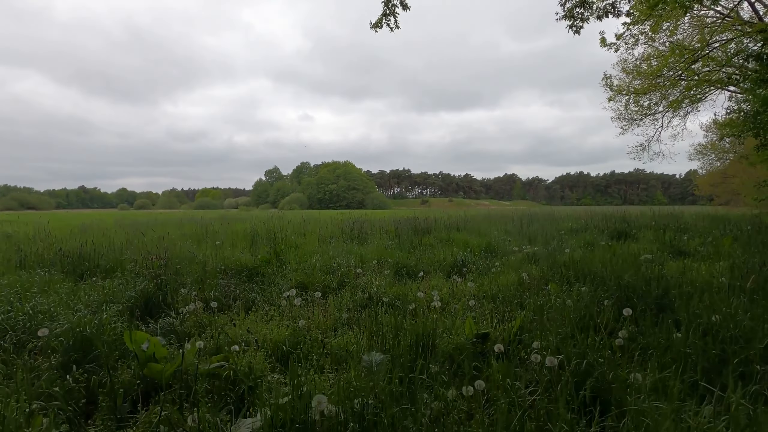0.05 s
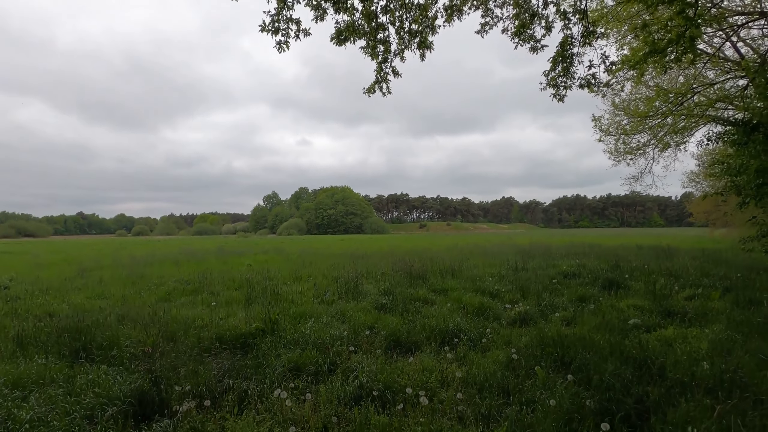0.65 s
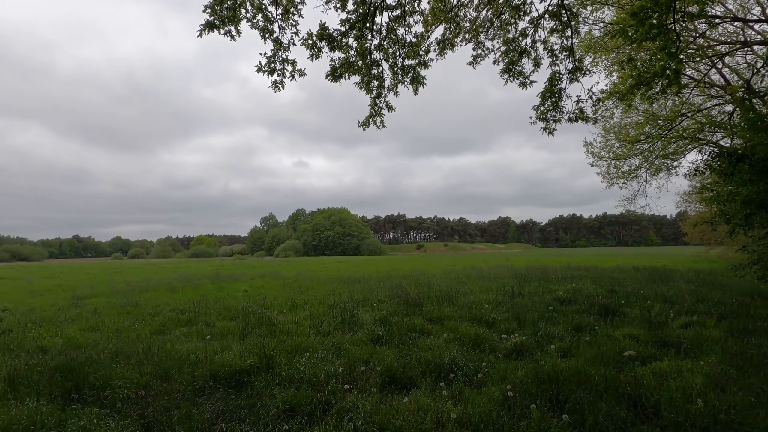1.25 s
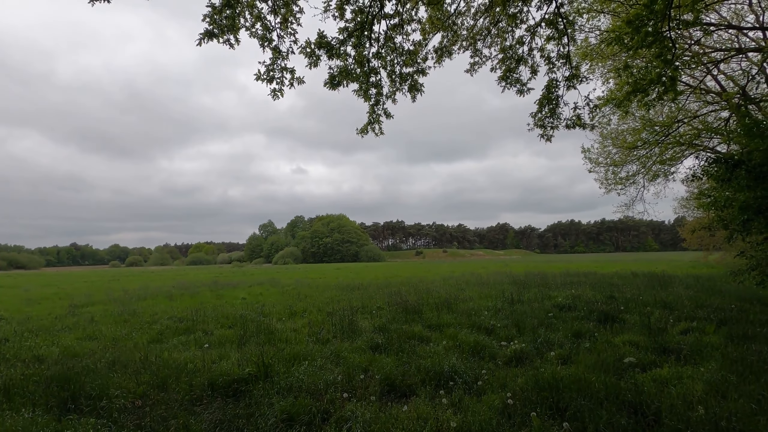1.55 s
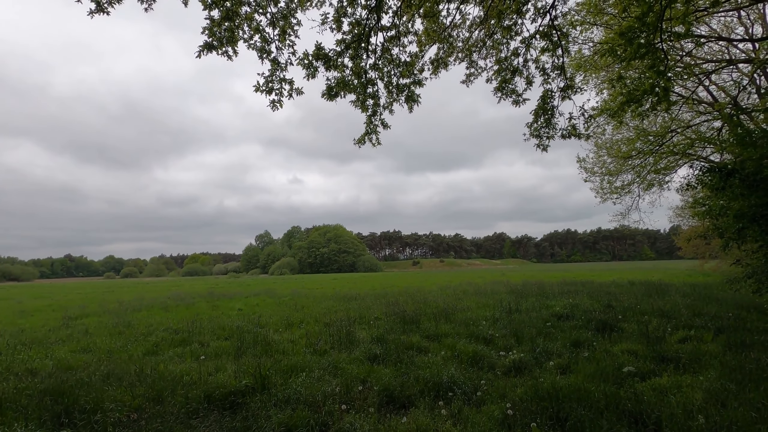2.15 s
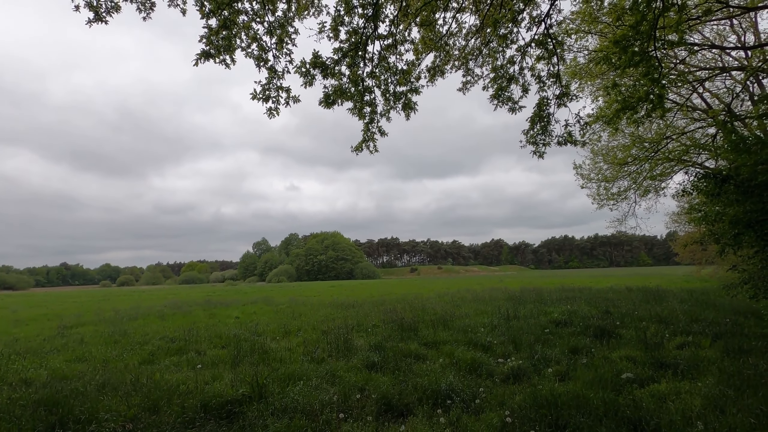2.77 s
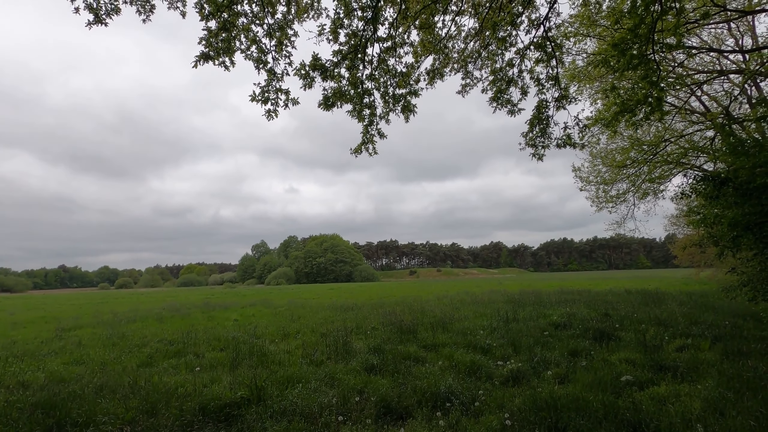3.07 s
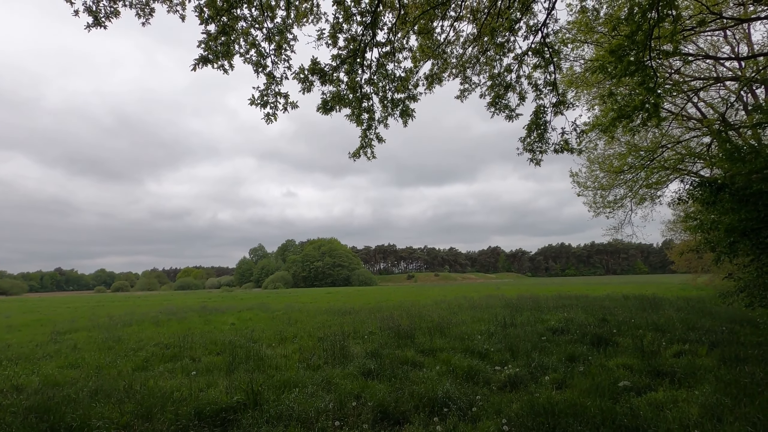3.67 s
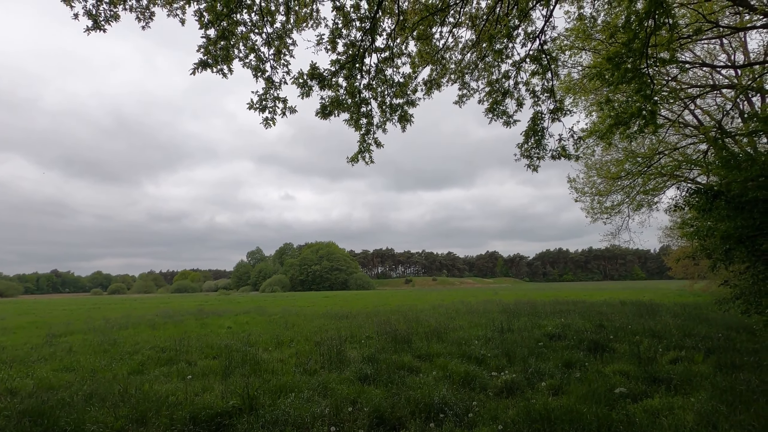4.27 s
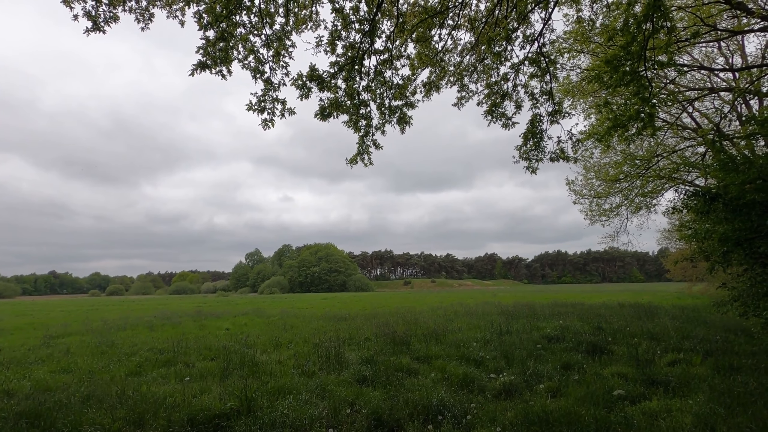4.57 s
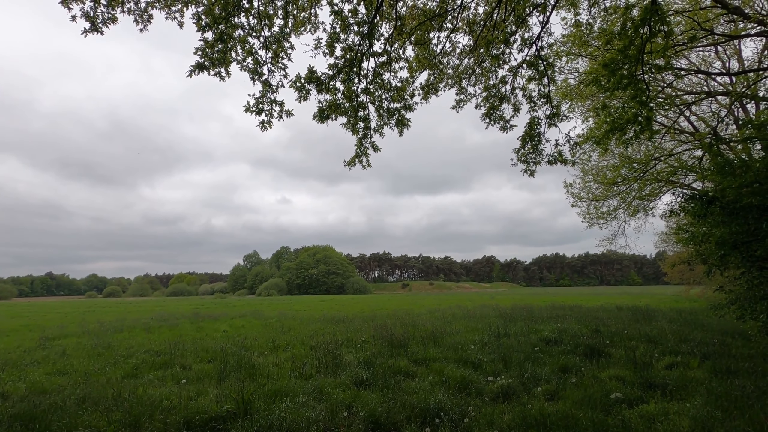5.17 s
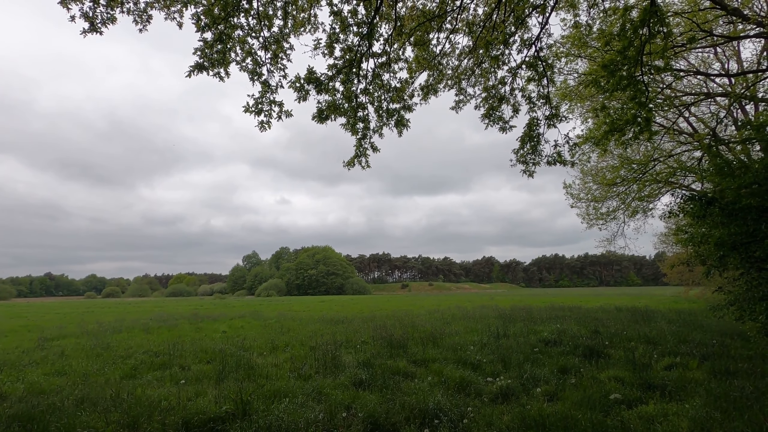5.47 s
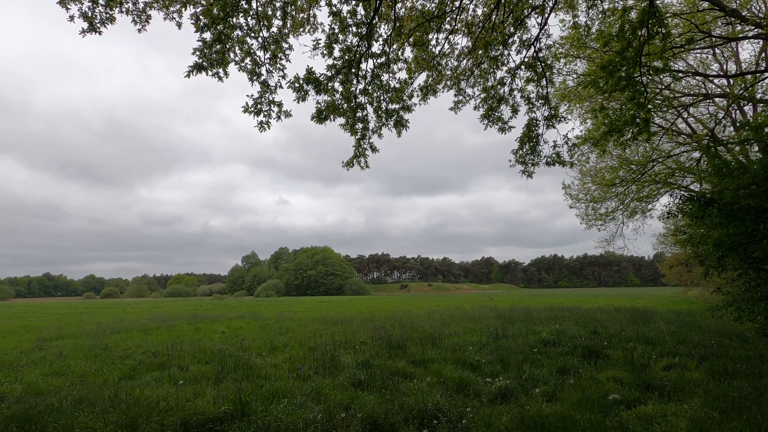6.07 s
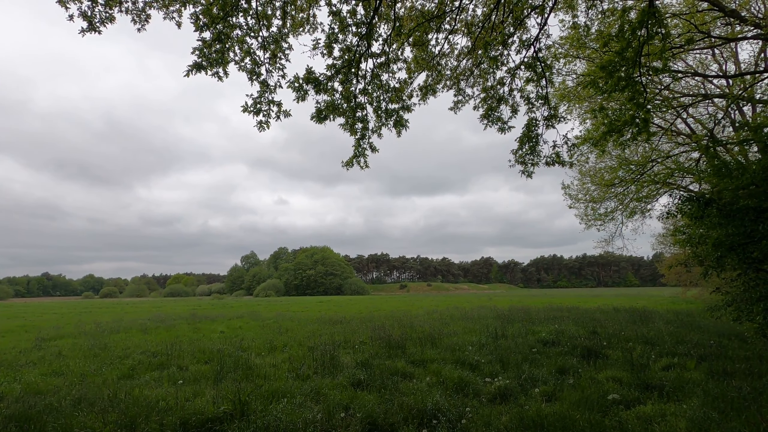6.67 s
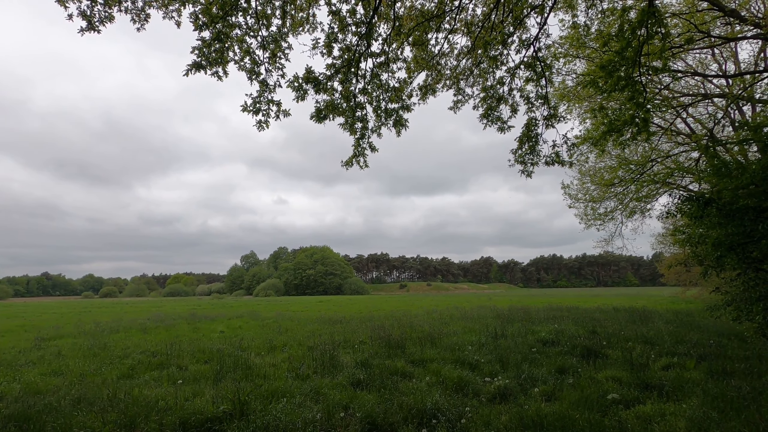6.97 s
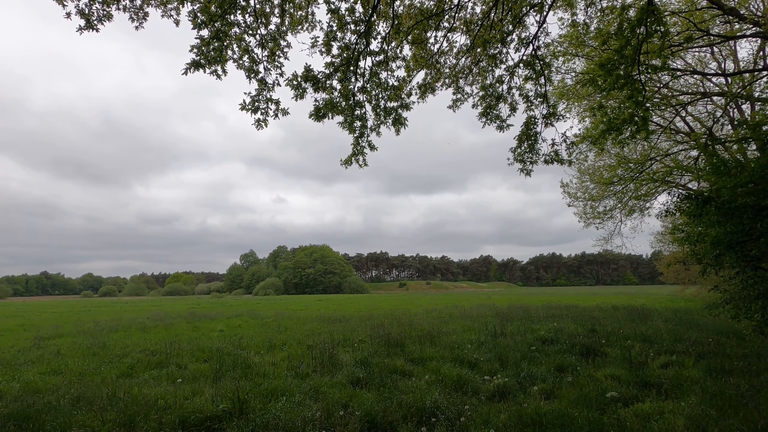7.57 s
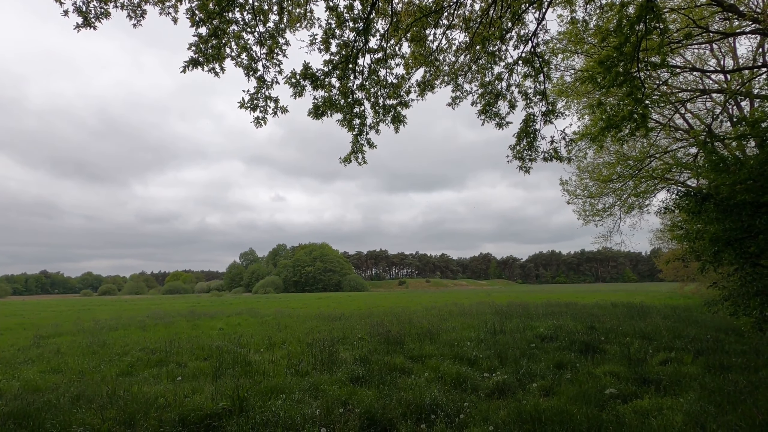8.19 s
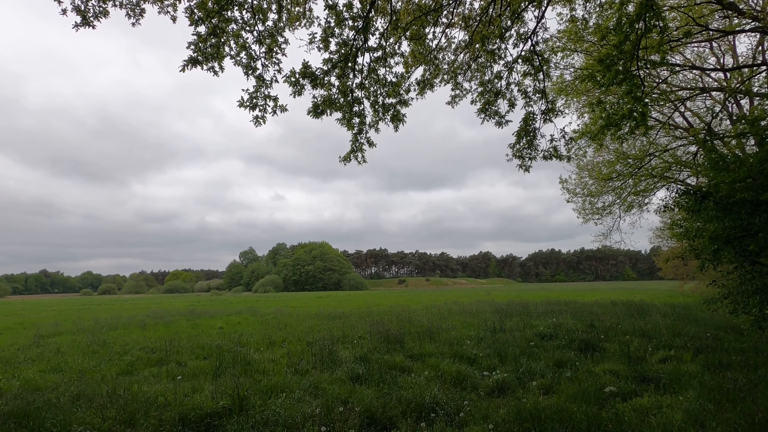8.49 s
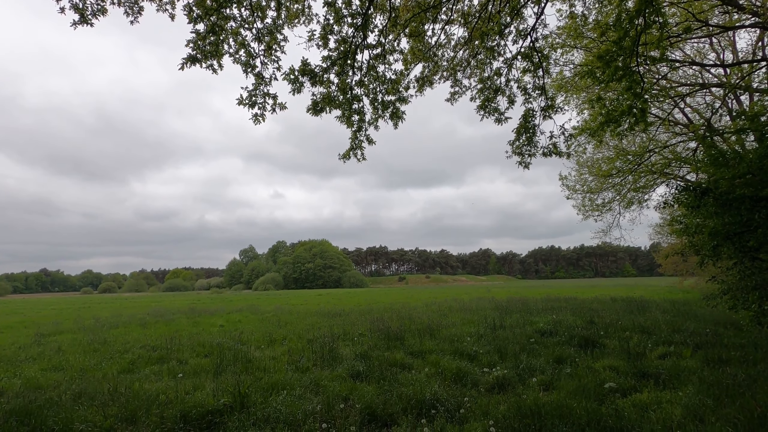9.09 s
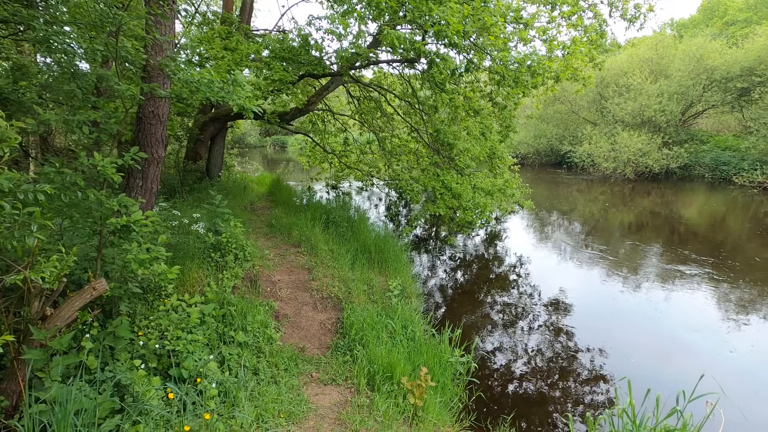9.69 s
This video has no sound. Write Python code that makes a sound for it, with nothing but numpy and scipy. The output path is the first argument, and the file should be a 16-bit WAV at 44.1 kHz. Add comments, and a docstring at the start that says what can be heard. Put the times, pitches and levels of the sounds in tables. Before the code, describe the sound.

A cuckoo calls repeatedly across a meadow while songbirds chirp and sing close by, after a brief rumble of wind on the microphone.

```python
"""Cuckoo across a meadow

A cuckoo calls seven times, its two nearly pure notes echoed by the edge of a wood. Close by, a
chaffinch sings one accelerating song among warblers and other songbirds; each voice is a gliding
tone from the syrinx, scattered by trees into reverberation. At first, turbulent wind buffets the
microphone and rustles the leaves. The sound stops abruptly near the end."""
import sys
import numpy as np
from scipy import signal
from scipy.fft import rfft, irfft
from scipy.io import wavfile
from scipy.ndimage import uniform_filter1d

SR = 44100
rng = np.random.default_rng(int(sys.argv[2]) if len(sys.argv) > 2 else 0)


def transcribe(signal):
    """Save signal, clipped to [-1, 1], as a 16-bit WAV file at the path in sys.argv[1]."""
    frames = np.atleast_2d(signal).T
    limited = np.clip(frames, -1, 1)
    pcm = np.round(limited * 32767).astype(np.int16)
    wavfile.write(sys.argv[1], SR, pcm)


N = 433944
TIME = np.arange(N) / SR


def undb(db):
    """The decibel scale: amplitude grows tenfold every 20 dB."""
    return 10 ** (np.asarray(db) / 20)


def curve(rows):
    """Linear interpolation of (time_s, value) rows over the whole scene."""
    return np.interp(TIME, *np.transpose(rows))


def walk(rate_hz, size):
    """Random modulation: Gaussian values joined by straight lines, with a spread near 1."""
    position = np.arange(size) / SR * rate_hz
    knots = int(position[-1]) + 2
    return 1.2 * np.interp(position, np.arange(knots), rng.standard_normal(knots))


def pan(db):
    """Interaural level difference: gains of mean power 1, the left db above the right."""
    gains = undb(np.array([[db], [-db]]) / 2)
    return gains / np.sqrt(np.mean(gains ** 2))


def add(out, start_s, x):
    """Superposition: a sound is summed into the mix from its starting time."""
    i = max(int(start_s * SR), 0)
    out[..., i:i + x.shape[-1]] += x[..., :max(N - i, 0)]


def beats(first_s, last_s, period_s, change_s=0):
    """Onsets in a rhythm whose period changes by change_s from note to note."""
    k = np.arange(round((last_s - first_s) / period_s) + 1)
    return np.linspace(first_s, last_s, len(k)) + change_s * k * (k - k[-1]) / 2


def correlated_pair(noises, correlation):
    """Partial coherence: two independent noises each take a share of a third."""
    return noises[:2] * np.sqrt(1 - correlation) + noises[2] * np.sqrt(correlation)


def noise(spectrum, correlation=0, pan_db=0):
    """Spectral shaping: stereo noise of rms 1 follows (frequency_hz, level_db) rows."""
    hz, db = np.transpose(spectrum)
    bins_hz = np.maximum(np.fft.rfftfreq(N, 1 / SR), 1)
    gain = undb(np.interp(np.log(bins_hz), np.log(hz), db, left=-120, right=-120))
    white = correlated_pair(rng.standard_normal((3, N)), correlation)
    shaped = irfft(rfft(white) * gain, N)
    return shaped / shaped.std() * pan(pan_db)


def whistle(hz, rms):
    """A syrinx sings a nearly pure tone, whose phase is the integral of its frequency."""
    return np.sqrt(2) * rms * np.sin(2 * np.pi * np.cumsum(hz) / SR)


def syllable(shape, stretch, pitch_ratio, waver, overtone_db=-60):
    """Frequency modulation: a whistle and its second harmonic waver along a rounded contour."""
    time_s, hz, db = np.transpose(shape)
    t = np.arange(int(time_s[-1] * stretch * SR)) / SR / stretch
    contour_hz = uniform_filter1d(np.interp(t, time_s, hz), len(t) // 20)
    pitch_hz = contour_hz * pitch_ratio * (1 + waver * walk(350, len(t)))
    gain = undb(np.interp(t, time_s, db)) * signal.windows.tukey(len(t), .08)
    return whistle(pitch_hz, gain) + whistle(2 * pitch_hz, gain * undb(overtone_db))


def wood(x, t60_s, build_s, grain):
    """Multiple scattering by trunks and crowns: a tail builds up, then decays exponentially."""
    t = np.arange(int(1.5 * SR)) / SR
    reflections = rng.standard_normal((3, len(t)))
    reflections *= np.exp(grain * rng.standard_normal((3, len(t))))  # a few stand out
    tail = correlated_pair(reflections, correlation=.53)
    tail *= undb(-60 * t / t60_s) * (1 - np.exp(-t / build_s))
    tail /= np.sqrt(np.sum(tail ** 2, axis=1, keepdims=True))
    return signal.fftconvolve(np.atleast_2d(x), tail, axes=1)[:, :N]


def branches(x, direct_db, t60_s):
    """Early reflections from twigs and leaves follow the direct sound, which leans to the left."""
    return undb(direct_db) * x * pan(10) + wood(x, t60_s, build_s=.0051, grain=.44)


def wind(rise_db_per_s=221, fall_db_per_s=255):
    """Turbulent pressure on the microphone ports: a rumble that swells and dies with each gust."""
    # light air between gusts: time_s, level_db
    draught = [(.5, -45.5), (.66, -66), (1.5, -74.5), (2.1, -81), (4.8, -78), (5.0, -88), (6.5, -83),
               (9.6, -81)]
    # gusts: peak_s, level_db
    gusts = [(0.028, -29.5), (0.128, -27), (0.294, -25.5), (0.449, -40), (.81, -57.5), (1.241, -39),
             (1.4, -55), (2.35, -61)]
    # spectrum of the rumble: frequency_hz, level_db
    spectrum = [(12, -33.5), (20, 5), (43, 3), (63, 2), (110, -15), (198, -31.5), (400, -49), (520, -80),
                (880, -120)]
    level_db = curve(draught)
    for peak_s, peak_db in gusts:
        drop_db = np.maximum((peak_s - TIME) * rise_db_per_s, (TIME - peak_s) * fall_db_per_s)
        level_db = np.maximum(level_db, peak_db - drop_db)
    return noise(spectrum, correlation=.11, pan_db=4) * undb(level_db + 5 + walk(17, N))


def leaves():
    """Leaves stirred by the wind add incoherently to a flickering broadband noise."""
    # spectrum of the rustle: frequency_hz, level_db
    spectrum = [(500, -25), (1100, 2), (1800, 0.5), (3000, -1), (5000, -2), (7500, -14), (9500, -23.5),
                (13000, -43.5), (15000, -48)]
    # its envelope: time_s, level_db
    rustle = [(0, -61), (.3, -67), (.38, -65), (.5, -59.5), (.6, -68), (.85, -72), (1.3, -79.5), (2, -110)]
    return noise(spectrum, correlation=.24, pan_db=4.5) * undb(curve(rustle) + 2 * walk(90, N))


def air(level_db=-70):
    """Ambient noise: a faint, nearly steady floor lies under everything."""
    # spectrum of the open air: frequency_hz, level_db
    spectrum = [(20, 4), (55, -1), (107, -8), (186, 5.5), (280, -1.5), (646, -5.5), (900, -10.5),
                (1500, -11), (3000, -5), (5000, -24.5), (8000, -24), (9000, -34), (15500, -35)]
    return noise(spectrum, correlation=.19, pan_db=-1) * undb(level_db + .7 * walk(4, N))


def chorus():
    """Incoherent summation: the short slurs of many far birds merge with a band of noise."""
    # spectrum of the chorus: frequency_hz, level_db
    spectrum = [(1400, -29), (2200, -9.5), (3200, -0.5), (4400, 0), (5500, -11), (7400, -28), (8600, -35)]
    # swell of the birds deep in the wood: time_s, level_db
    swell = [(0, -77), (.8, -72), (1.5, -67.5), (3, -74), (5.3, -57.5), (6, -76), (6.8, -62.5),
             (7.8, -60.5), (9.6, -70)]
    hz, db = np.transpose(spectrum)
    chirps = np.zeros(N)
    for when, height, length, slope, loud in rng.random((420, 5)):
        size = int((.0301 + .09 * length) * SR)
        centre_hz = 1900 + 5600 * height
        pitch_hz = centre_hz * (1 + .4 * (slope - .6) * np.linspace(-.5, .5, size))
        envelope = np.hanning(size) * undb(np.interp(centre_hz, hz, db) + 10 * loud)
        add(chirps, when * N / SR, whistle(pitch_hz, envelope))
    far = wood(chirps, t60_s=.74, build_s=.021, grain=.3)
    shimmer = undb(2.5) * far / far.std() + undb(-5) * noise(spectrum)
    return shimmer * undb(curve(swell)) * pan(5.8)


def songbirds(flutter_hz=95):
    """Fast modulation of frequency and amplitude adds sidebands, turning some whistles to buzzes."""
    # the loudest whistles, slurs and buzzes:
    # start_s, perch, length_s, start_hz, middle_hz, end_hz, buzz_depth, level_db
    notes = [(0.059, "ahead", 0.13, 3845, 4010, 4010, 0.3, -58.5),
             (0.077, "ahead", .16, 2380, 2350, 2340, 0.06, -67.5),
             (0.12, "ahead", 0.11, 6500, 5850, 5800, 0.07, -74.5),
             (0.249, "overhead", 0.045, 5700, 5000, 4200, 0, -65),
             (0.29, "ahead", 0.14, 2350, 2018, 1690, 0.14, -61),
             (1.404, "bush", 0.12, 4970, 4140, 2460, .18, -62.5),
             (2.439, "trees", 0.044, 3420, 2960, 2750, 0.03, -63),
             (2.473, "trees", 0.044, 6600, 5520, 5200, 0.13, -58),
             (2.68, "bush", 0.062, 2790, 2940, 3950, 0, -65.5),
             (3.387, "bush", 0.082, 3700, 3190, 3130, 0.22, -60.5),
             (3.422, "overhead", 0.043, 5870, 5490, 5400, 0.07, -53.5),
             (3.692, "trees", .08, 2713, 2555, 2480, 0.1, -62.5),
             (3.918, "trees", 0.041, 3234, 2885, 2300, 0.34, -52),
             (3.949, "finch", .044, 2585, 3323, 3390, .8, -49),
             (4.045, "finch", 0.025, 4420, 5630, 4530, 0.46, -53),
             (4.066, "finch", 0.062, 4475, 3420, 3040, 0.7, -46.5),
             (4.103, "trees", 0.082, 3300, 2570, 2197, 0.63, -54.5),
             (4.389, "wood", 0.29, 1570, 1540, 1563, 0.17, -70.5),
             (4.554, "ahead", 0.045, 2437, 2350, 2420, 0.7, -53),
             (4.743, "wood", 0.1, 6930, 7150, 7140, .6, -77),
             (4.756, "ahead", .15, 2800, 2170, 1660, 0.87, -61),
             (4.881, "finch", 0.028, 3570, 3930, 3120, 0.48, -41),
             (5, "finch", 0.062, 4800, 4170, 3970, 0.75, -48),
             (5.068, "trees", 0.12, 3880, 2862, 1942, 0.51, -52),
             (5.319, "ahead", 0.055, 3500, 3310, 2900, 0, -59),
             (5.483, "overhead", 0.031, 6600, 5820, 3930, 0, -68.5),
             (5.521, "overhead", 0.049, 3570, 3503, 3490, .06, -58.5),
             (5.545, "overhead", 0.05, 2935, 2660, 2325, 0.3, -55),
             (5.641, "overhead", 0.063, 2400, 2130, 2150, 0.52, -59.5),
             (5.712, "overhead", .052, 2315, 2720, 2940, 0.2, -53),
             (5.851, "overhead", 0.16, 2267, 2235, 2223, 0.01, -58),
             (5.919, "ahead", .069, 6070, 5970, 6240, 0.6, -70),
             (5.96, "ahead", 0.092, 3260, 3426, 3500, 0.38, -60.5),
             (6.102, "overhead", 0.045, 2210, 2930, 3780, 0.26, -54.5),
             (6.127, "bush", 0.12, 3690, 3830, 3890, 0.33, -53),
             (6.327, "bush", 0.091, 8020, 7980, 7700, 0.21, -77),
             (6.36, "bush", 0.017, 4180, 4640, 5170, 0.08, -52.5),
             (6.381, "overhead", 0.021, 3490, 3030, 2420, 0.1, -58),
             (6.408, "overhead", 0.028, 2560, 2780, 3220, 0.2, -58),
             (6.473, "trees", .07, 7550, 7260, 7320, 0.46, -70.5),
             (6.559, "trees", 0.025, 4410, 4810, 5160, 0.1, -54),
             (6.652, "bush", 0.082, 4320, 4020, 3990, 0.72, -60.5),
             (6.79, "bush", 0.038, 3634, 3690, 4350, 0.58, -53.5),
             (6.88, "bush", 0.088, 2635, 3028, 2930, 0, -50),
             (7.029, "trees", 0.036, 4860, 5040, 5080, .3, -54.5),
             (7.032, "trees", .081, 7200, 7220, 7360, 0.4, -73),
             (7.231, "overhead", 0.13, 4400, 4307, 4310, 0.05, -53),
             (7.497, "bush", 0.018, 3730, 3620, 2940, 0.04, -50),
             (7.529, "trees", .19, 3180, 2690, 2160, 0.01, -65),
             (7.709, "bush", 0.12, 3950, 3730, 3660, .36, -54),
             (7.781, "bush", 0.079, 3560, 3315, 3700, .05, -47),
             (7.898, "bush", 0.12, 2940, 2767, 3320, 0.1, -54),
             (8.055, "trees", 0.089, 5100, 4750, 4200, 0.04, -60.5),
             (8.136, "bush", .1, 3900, 3150, 3213, 0.04, -49.5),
             (8.227, "trees", .14, 7620, 7860, 7760, 0.06, -69),
             (8.306, "bush", 0.086, 3520, 3342, 3497, 0, -49),
             (8.413, "ahead", 0.085, 2300, 2466, 2560, 0, -58.5),
             (8.497, "ahead", 0.12, 6900, 6300, 5950, 0.49, -73),
             (8.759, "trees", 0.062, 4900, 4256, 3250, 0.83, -59.5),
             (8.948, "ahead", 0.2, 5400, 5180, 5325, 0.1, -55),
             (9.234, "trees", 0.19, 7470, 6960, 6750, 0.26, -66.5),
             (9.479, "trees", 0.089, 5100, 4624, 3740, 0.17, -54.5)]
    # sound paths from each perch: pan_db, direct_db, scattered_db
    perches = {"finch": (11, -3, -5.5), "bush": (18, -2.9, -4), "trees": (4.6, -3.5, -1.5),
               "ahead": (-4, -2.5, -3), "overhead": (-1, -0.54, -8), "wood": (9, -4.5, 0)}
    direct, scattered = np.zeros((2, N)), np.zeros(N)
    for start_s, perch, length_s, start_hz, middle_hz, end_hz, buzz, db in notes + soft_phrases():
        size = int(length_s * SR)
        flutter_phase = 2 * np.pi * np.cumsum(flutter_hz * (1 + .045 * walk(40, size))) / SR
        parabola = np.polyfit([0, .5, 1], [start_hz, middle_hz, end_hz], 2)
        contour_hz = np.polyval(parabola, np.linspace(0, 1, size))
        roughness = buzz * (.16 * np.cos(flutter_phase) + .035 * walk(702.7, size))
        pitch_hz = contour_hz * (1 + roughness + .0045 * walk(200, size))
        envelope = signal.windows.tukey(size, .4) * (1 + buzz * np.sin(flutter_phase))
        note = undb(db) * whistle(pitch_hz, envelope)
        pan_db, direct_db, scattered_db = perches[perch]
        add(direct, start_s, note * undb(direct_db) * pan(pan_db))
        add(scattered, start_s, note * undb(scattered_db + 12.3 * buzz))
    near = branches(direct, direct_db=.5, t60_s=.081)
    return near + wood(scattered, t60_s=.96, build_s=.019, grain=.5) * pan(4.2)


def thin_calls():
    """A small bird repeats a very high, sinking tone, trailed by reverberation."""
    # contour of the call: time_s, pitch_hz, level_db
    contour = [(0, 9000, -8), (.06, 8750, 0), (.13, 8450, 0), (.2, 8150, -6)]
    # calls: start_s, level_db
    calls = [(.14, -86), (.98, -82), (7.221, -76.5), (8.221, -83)]
    voice = np.zeros(N)
    for start_s, db in calls:
        add(voice, start_s, undb(db) * syllable(contour, stretch=1, pitch_ratio=1, waver=.003))
    tail = wood(voice, t60_s=.57, build_s=.015, grain=.5)
    return undb(-4) * voice * pan(17.4) + undb(-6.5) * tail * pan(7)


def cuckoo():
    """Two notes a major third apart return from the tree line as echoes, delayed by the longer path."""
    # calls: start_s, pitch_ratio, first_db, second_delay_s, second_db, second_length_s
    calls = [(.317, .977, -57, .28, -54, .235), (2.19, .993, -48.5, .285, -53, .205),
             (3.68, .998, -48, .285, -53, .205), (5.055, .998, -47.5, .288, -52.5, .2),
             (6.39, 1.0, -46.5, .285, -51, .2), (7.728, 1.002, -45.3, .287, -50.5, .197),
             (9.052, 1.002, -45.5, .292, -50.5, .195)]
    # arched first note: time_s, pitch_hz, level_db
    cuck = [(0, 530, -28), (.012, 595, -13), (.028, 665, -6), (.045, 689, -1.5), (.068, 686, 0),
            (.082, 662, -1), (.096, 598, -4), (.11, 535, -18)]
    # level second note: length_fraction, pitch_hz, level_db
    coo = [(0, 525, -24), (.09, 544, -7), (.22, 550, -.5), (.58, 550, 0), (.8, 549, -3), (.92, 544, -8),
           (1, 532, -22)]
    # reflections from trees round the meadow: delay_s, level_db, pan_db
    echoes = [(.024, -13, 2), (.052, -17, 4), (.085, -19, 6), (.12, -13, 7), (.165, -24, 8)]
    voice = np.zeros(N)
    for start_s, ratio, first_db, delay_s, second_db, length_s in calls:
        add(voice, start_s, undb(first_db) * syllable(cuck, 1, ratio, waver=.00071))
        add(voice, start_s + delay_s, undb(second_db) * syllable(coo, length_s, ratio, waver=.01))
    out = voice * pan(-.29)
    # each group of trees returns a cluster of reflections, which blurs the glide
    for delay_s, db, pan_db in echoes:
        add(out, delay_s, undb(db) * wood(voice, t60_s=.16, build_s=.004, grain=.3) * pan(pan_db))
    # open ground holds almost no reverberation
    return out + undb(-25) * wood(voice, t60_s=.9, build_s=.04, grain=.3) * pan(3)


def chaffinch(pitch_spread=.0188, spread_db=.03):
    """Runs of frequency sweeps quicken and grow louder, smeared by scattering round the perch."""
    # runs of the song: first_s, last_s, kind, period_s, period_change_s, stretch, first_db, last_db
    runs = [(0.893, 1.115, "tsip", .23, 0, 0.96, -58, -51.5),
            (1.273, 2.237, "tsip", .138, -0.0032, 0.92, -52, -53.5),
            (2.389, 3.036, "tsew", .094, -0.0009, 0.93, -67.5, -62.5),
            (3.122, 3.299, "tsew", .0875, 0, 0.62, -54, -53.5),
            (3.386, 3.843, "chiv", .0767, -.0006, 0.92, -48.5, -43.5),
            (4.277, 4.62, "chew", .1137, 0.0018, 1.005, -37.5, -38.5)]
    # contour of each kind of syllable: time_s, pitch_hz, level_db
    contours = { "tsip": [(0, 4315, -10.5), (.008, 4270, 4.5), (.018, 4340, -14), (.034, 4000, -4.5),
                (.055, 3320, -18)], "tsew": [(0, 7500, -20.5), (.008, 6300, -7.5), (.018, 5534, -3.5),
                (.028, 4750, 4), (.038, 3900, -1), (.046, 4034, -18.5), (.054, 4770, 1.5)],
                "chiv": [(0, 7120, -30.5), (.008, 5346, -11.5), (.014, 4273, 4), (.021, 3910, -11.5),
                (.026, 3613, -3.5), (.033, 4370, -3), (.04, 4570, -29.5)], "chew": [(0, 6154, -8.5),
                (.005, 3737, -24.5), (.009, 2953, -39), (.017, 3214, -13), (.029, 4020, 0),
                (.035, 5310, -14), (.041, 4135, -14), (.056, 2344, -5.5)]}
    voice = np.zeros(N)
    for first_s, last_s, kind, period_s, change_s, stretch, first_db, last_db in runs:
        for start_s in beats(first_s, last_s, period_s, change_s):
            sharp, soft = rng.standard_normal(2)
            db = np.interp(start_s, [first_s, last_s], [first_db, last_db]) - spread_db * soft
            pitch_ratio = 1 + pitch_spread * sharp
            note = syllable(contours[kind], stretch, pitch_ratio, waver=.015, overtone_db=-47)
            add(voice, start_s, undb(db) * note)
    near = branches(voice, direct_db=-3.5, t60_s=.26) * pan(29)
    trees = undb(2) * wood(voice, t60_s=1, build_s=.0037, grain=1) * pan(6.1)
    return near + trees


def soft_phrases(jitter_s=.011, spread_db=1.5, bend_octaves=.065):
    """Random variation: rows of songbird notes, each with its own timing, pitch, glide and level."""
    # twitters, warbles and pips: first_s, last_s, perch, period_s, length_s, centre_hz,
    # span_octaves, glide_octaves, buzz_depth, level_db
    phrases = [(0.918, 1.286, "wood", .18, 0.082, 3472, 0.056, -0.14, 0.59, -63),
               (1.45, 2.855, "wood", .1, 0.05, 3640, 0.46, -.1, 0.32, -64),
               (1.627, 2.24, "ahead", .15, 0.096, 2535, 0.035, -.28, 0.1, -62),
               (2.938, 3.261, "trees", .16, 0.058, 2697, .03, -0.13, 0, -62.5),
               (1.844, 2.094, "wood", .12, 0.06, 5940, .05, -0.077, 0.2, -79.5),
               (2.828, 3.149, "trees", .32, 0.066, 4450, 0.066, -0.0081, 0.04, -57.5),
               (4.726, 4.8, "trees", .075, 0.019, 5530, .01, 1, .15, -59),
               (6.5, 6.95, "wood", .15, 0.07, 6270, .12, -.15, 0.31, -75),
               (6.219, 7.098, "trees", .44, .08, 4920, .05, 0.13, 0.36, -62.5),
               (7.424, 7.6, "bush", .085, 0.03, 3874, 0.4, -.3, 0.07, -54),
               (8.412, 8.591, "trees", .17, .12, 4535, 0.011, 0.02, 0.1, -58),
               (8.449, 9.103, "wood", .16, .07, 4590, 0.19, 0.22, 0.55, -67.5),
               (8.827, 9.271, "trees", .15, 0.075, 3207, 0.013, -0.0069, 0.09, -57)]
    notes = []
    for first_s, last_s, perch, period_s, length_s, centre_hz, span, glide, buzz, db in phrases:
        onsets = beats(first_s, last_s, period_s)
        for start_s, (late, high, steep, bend, soft) in zip(onsets, rng.uniform(-1, 1, (len(onsets), 5))):
            sweep = glide * (1 + steep / 2) / 2
            arch = bend_octaves * bend * min(abs(glide) * 10, 1)
            hz = centre_hz * 2 ** (span * high + np.array([-sweep, arch, sweep]))
            notes.append((start_s + jitter_s * late, perch, length_s, *hz, buzz, db - spread_db * soft))
    return notes


def ticks(decay_s=.0023):
    """Damped transients: bursts of bright noise decay exponentially and are heard as tiny snaps."""
    # dry ticks among the leaves: start_s, level_db
    snaps = [(3.486, -54), (3.769, -48), (4.394, -53)]
    envelope = np.zeros(N)
    for start_s, db in snaps:
        add(envelope, start_s, undb(db) * np.exp(-np.arange(600) / SR / decay_s))
    bright = noise([(3000, -.5), (7500, 13), (9000, -5), (12000, -30)], correlation=.68, pan_db=-8)
    return undb(-10) * envelope * bright


def high_trill(start_s=7.25, period_s=.15):
    """A bird further back repeats a steep downward slur; reverberation outweighs the direct sound."""
    # contour of the slur: time_s, pitch_hz, level_db
    slur = [(0, 7400, .5), (.02, 6850, -1.5), (.04, 5635, 4), (.075, 4200, 7.5), (.1, 3550, -9)]
    voice = np.zeros(N)
    for k in range(6):
        note = syllable(slur, stretch=1, pitch_ratio=1, waver=.0088)
        add(voice, start_s + k * period_s, undb(-59) * note)
    tail = wood(voice, t60_s=.99, build_s=.0089, grain=.69)
    return undb(-12.5) * voice * pan(5) + tail * pan(4)


def ports(x, lag_samples=5):
    """Arrival-time difference: sound reaches the left microphone port slightly later."""
    return np.array([np.roll(x[0], lag_samples), x[1]])


def scene():
    """The sound pressures of the birds and the breeze add linearly."""
    birds = cuckoo() + chaffinch() + songbirds() + thin_calls() + high_trill() + chorus()
    return ports(birds) + wind() + leaves() + air() + ticks()


def record(dry, stop_s=9.586, cutoff_hz=15700):
    """Gating and low-pass filtering: the sound eases in and stops abruptly, leaving a faint hiss."""
    gate = np.clip(np.minimum(TIME / .02, (stop_s - TIME) / .004), 0, 1) ** 2
    hiss = undb(-112) * rng.standard_normal((2, N))
    lowpass = signal.ellip(8, .2, 70, cutoff_hz, fs=SR, output="sos")
    return signal.sosfilt(lowpass, dry * gate + hiss)


dry = scene()
out = record(dry)
transcribe(out)
```